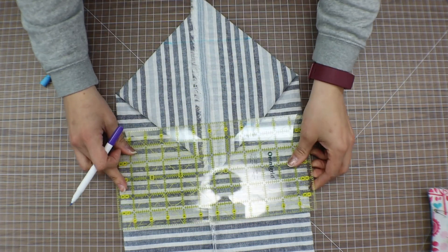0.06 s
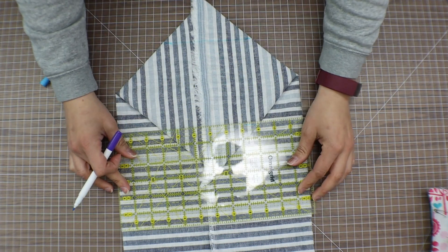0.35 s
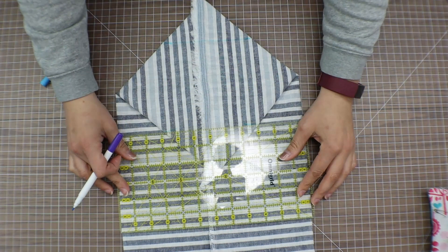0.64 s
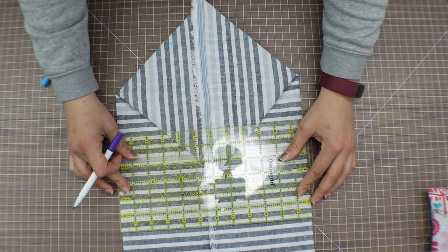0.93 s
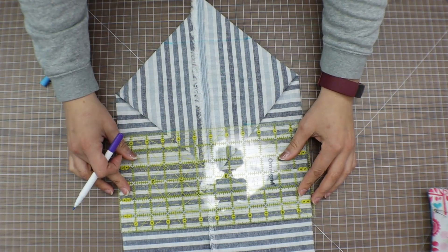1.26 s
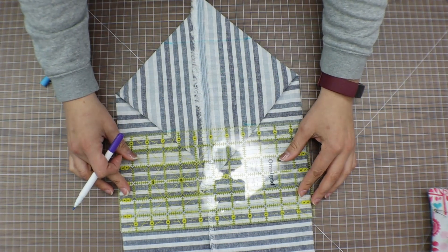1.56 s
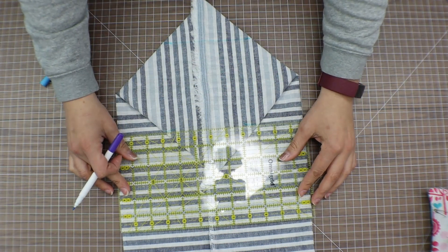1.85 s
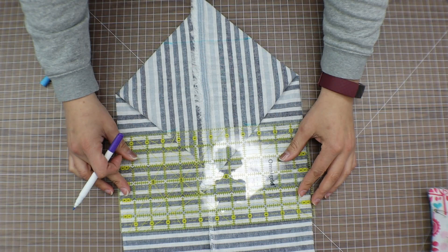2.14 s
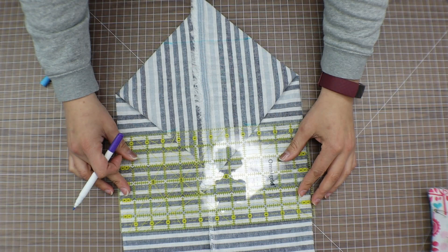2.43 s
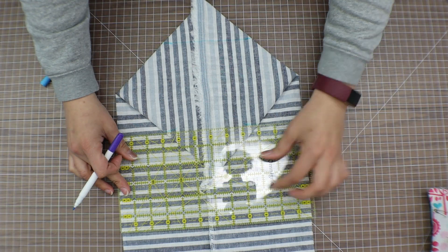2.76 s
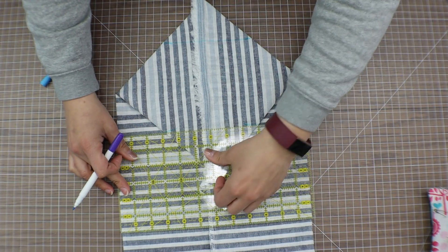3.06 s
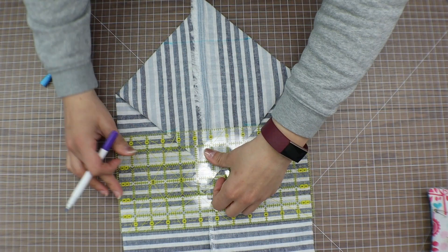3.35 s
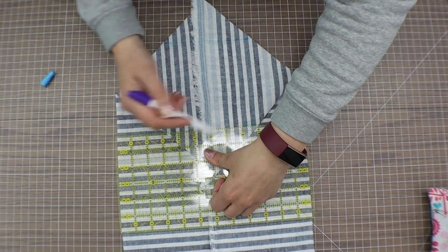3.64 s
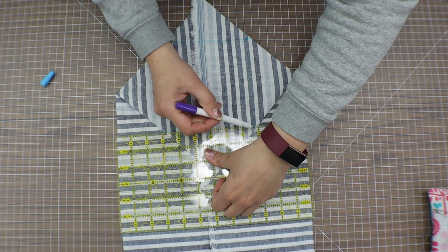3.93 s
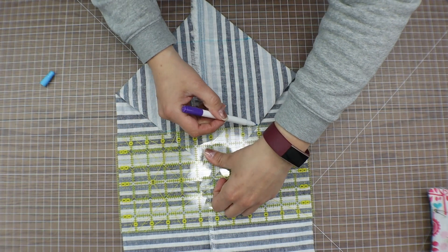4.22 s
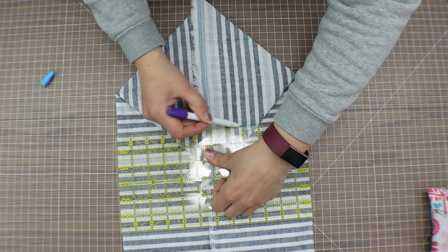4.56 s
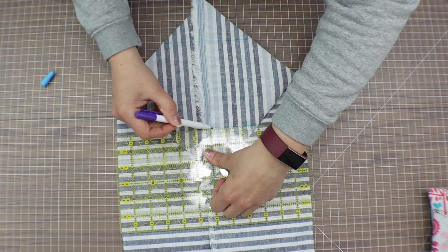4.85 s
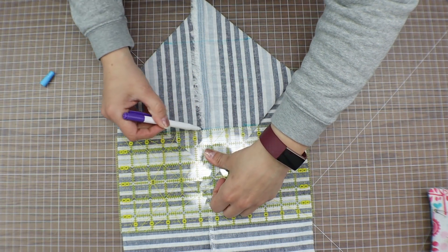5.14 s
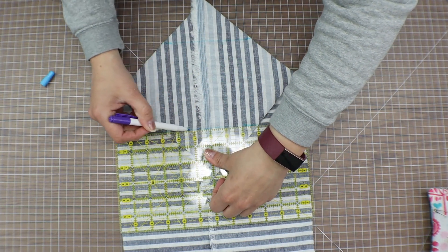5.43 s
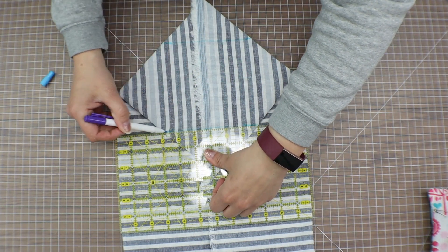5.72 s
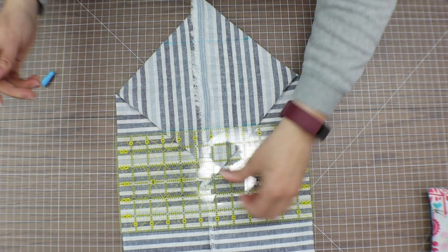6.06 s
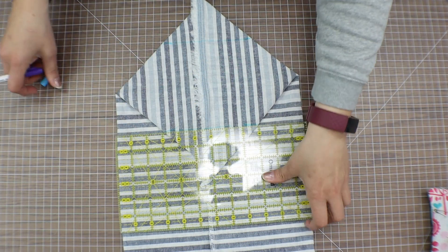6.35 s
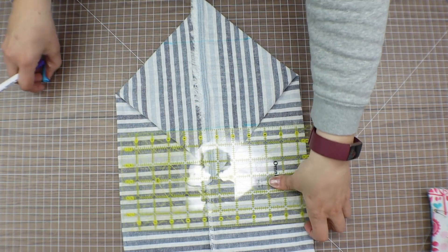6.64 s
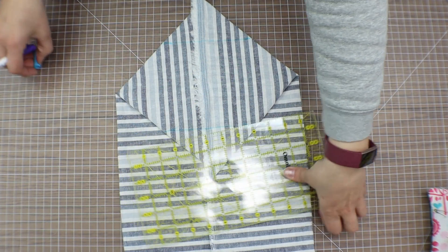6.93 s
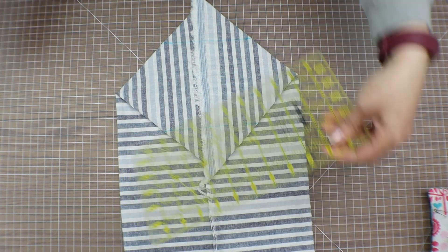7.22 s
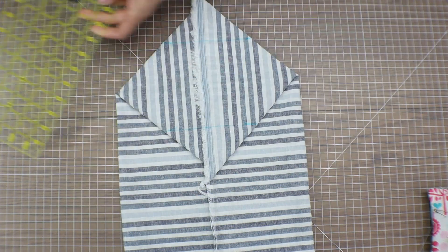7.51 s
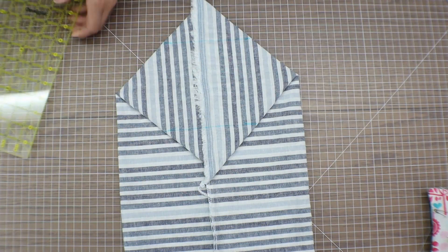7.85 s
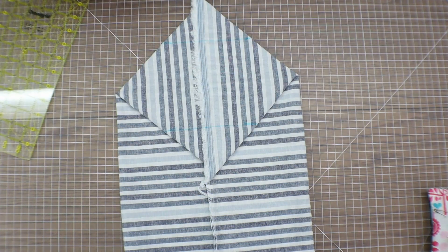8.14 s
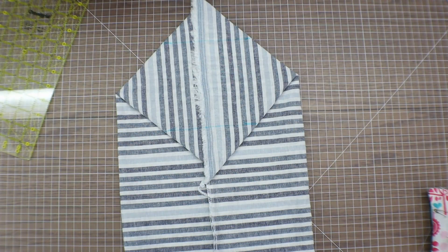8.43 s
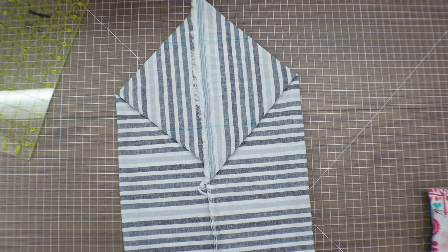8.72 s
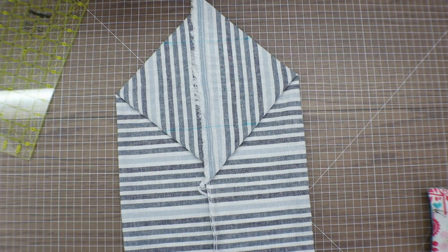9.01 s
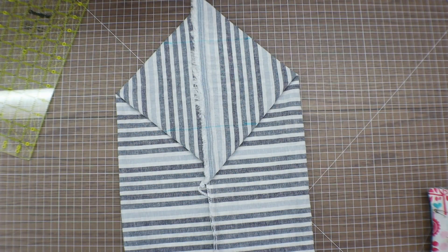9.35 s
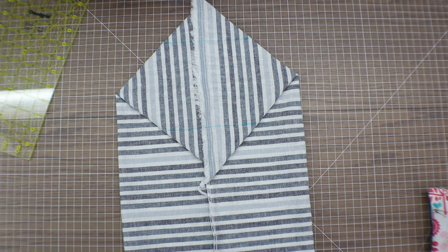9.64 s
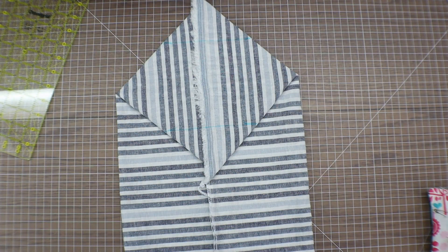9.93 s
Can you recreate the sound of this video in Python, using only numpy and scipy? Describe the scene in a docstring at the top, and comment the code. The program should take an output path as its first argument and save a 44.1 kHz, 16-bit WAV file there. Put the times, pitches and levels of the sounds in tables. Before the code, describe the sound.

A fan hums steadily in a small room, and everything is heard from one close microphone. In the first half second a plastic ruler is nudged over fabric on a cutting mat, with soft clicks, brief scrapes and a sleeve swish. After a lull, a light tap, a click and soft bumps come between 3 and 3.5 seconds. From about 4.5 to 5.8 seconds a felt marker hisses and rasps faintly in short strokes, with small ticks. Two sharper taps follow at 6 seconds. From 6.3 to 7.3 seconds the ruler clicks and slides off the cloth as sleeves rustle. Around 7.8 seconds it drops onto the mat with a sharp double clack, the loudest sound, briefly overloading, then rattles to rest as the table thumps. Faint plastic squeaks follow just after 8 seconds, and a few tiny ticks near 9.4 seconds.

```python
"""An acrylic ruler is nudged over fabric on a cutting mat, and a felt marker hisses along its edge.
The ruler is slid off, lifted and dropped on the mat: waves race through the plastic as a sharp
clack, and the table shakes. Sleeves swish, fingers tap and sliding plastic squeaks faintly.
A fan hums in the small room; one close microphone hears it all and overloads on the clack."""
import sys
import numpy as np
from scipy import signal
from scipy.fft import rfft, irfft, next_fast_len
from scipy.io import wavfile
from scipy.ndimage import map_coordinates

SR = 44100
rng = np.random.default_rng(int(sys.argv[2]) if len(sys.argv) > 2 else 0)


def output_pcm(signal):
    """Save a mono or channel-first signal as 16-bit PCM at the path in sys.argv[1].

    Samples are clipped to [-1, 1] before scaling.
    """
    pcm = np.clip(np.atleast_2d(signal).T, -1, 1) * 32767
    wavfile.write(sys.argv[1], SR, np.round(pcm).astype(np.int16))


N = 440118
TOP_HZ = 15850  # the highest frequency the recorder keeps

# light hits and bounces of the ruler's edge:
# (time [s], level [dB], brightness [dB per octave], knock on the mat [dB])
LIGHT_HITS = [(0.034, -34, -13, -39), (0.147, -31.5, -3, -42), (0.155, -37, 2, -50),
              (3.409, -26, -3.5, -38), (6.3033, -29, 0.5, -43), (6.335, -37, -2, -38),
              (6.433, -32.5, 2, -54), (6.448, -32, -7, -33), (6.494, -28, -2.5, -34),
              (6.502, -27, -4, -29.5), (6.521, -27, -2.5, -42), (6.691, -20.5, -2.5, -43),
              (6.697, -23.5, -1.5, -48), (6.8395, -27, 2.5, -36), (7.8238, -19, 1.5, -32.5),
              (7.917, -21, 1.5, -33), (7.9274, -17, 3.5, -31), (7.94, -20, 1, -30),
              (7.990, -15.5, 1.5, -24)]
# the dropped ruler lands on one end, then on the other: same columns
HARD_HITS = [(7.7893, -6, 2.5, -24), (7.9046, 6, -1, -28)]


def amp(db):
    """Turn decibels into a gain."""
    return 10 ** (np.asarray(db) / 20)


def unit(x):
    """Scale a sound to an average strength (rms) of 1."""
    return x / np.sqrt(np.mean(x ** 2) + 1e-20)


def along(points, hz):
    """Read between (frequency, value) points, with octaves evenly spaced."""
    freqs, values = np.transpose(points)
    return np.interp(np.log(hz + 1), np.log(freqs), values)


def fade(t, t60):
    """Die away by 60 dB every t60 seconds."""
    return np.exp(-np.log(1000) * t / max(t60, 1e-4))


def wobble(rate):
    """A smooth curve through `rate` random values a second."""
    values = rng.standard_normal(int(N * rate / SR) + 4)
    return map_coordinates(values, [np.arange(N) * rate / SR])


def filtered(x, response):
    """Turn each frequency of x up or down by the gain response(hz)."""
    size = next_fast_len(len(x) + 8192)
    return irfft(rfft(x, size) * response(np.fft.rfftfreq(size, 1 / SR)), size)[:len(x)]


def causal(db):
    """A filter with these levels that never sounds before it is struck (minimum phase)."""
    cepstrum = irfft(np.log(amp(db)))
    half = len(cepstrum) // 2
    cepstrum[1:half] *= 2
    cepstrum[half + 1:] = 0
    return np.exp(rfft(cepstrum))


def add(track, start_s, sound):
    """Mix a sound into the track."""
    start = max(round(start_s * SR), 0)
    track[start:start + len(sound)] += sound[:len(track) - start]


def gestures(rows, attack_s, release_t60):
    """One loudness curve per level column: each (start, length, levels) row swells, holds and fades."""
    curves, t = np.zeros((len(rows[0]) - 2, N)), np.arange(2 * SR) / SR
    for start, length, *db in rows:
        shape = np.clip(t / attack_s, 0, 1) * fade(np.maximum(t - length, 0), release_t60)
        span = curves[:, max(round(start * SR), 0):][:, :len(t)]
        span[:] = np.maximum(span, np.outer(amp(db), shape))
    return curves


def friction(colour, catch_rate, catch_db):
    """Rubbing noise: its strength jumps as threads catch and let go, and the rubbed thing colours it."""
    force = rng.standard_normal(N) * amp(catch_db * wobble(catch_rate))
    return unit(filtered(force, lambda hz: amp(along(colour, hz))))


def fan(mains_hz=60, blade_hz=272.35, air_db=-50, waver_db=1.0, drift_radians=0.027):
    """The mains supply hums, the blades add a tone and the air rushes steadily."""
    # hum at 1, 2, 3... times the mains frequency: (level [dB])
    mains_levels = [-61.5, -69, -65, -62.5, -82, -66, -71, -65, -55, -70]
    # the blade tone, then tones above it, each one mains frequency higher: (level [dB])
    blade_levels = [-51.5, -50.5, -64.5, -64.5, -51, -63.5]
    # rushing air and microphone hiss: (frequency [Hz], level [dB])
    air_colour = [(20, 0.5), (45, -5), (90, -1), (140, 3.5), (200, -2), (300, 0.5), (500, -2.5),
                  (700, -6.5), (1100, -8.5), (2000, -14), (3600, -16.5), (6000, -22.5), (11000, -24),
                  (15500, -25.5)]
    tones = [(mains_hz * (k + 1), db) for k, db in enumerate(mains_levels)]
    tones += [(blade_hz + mains_hz * k, db) for k, db in enumerate(blade_levels)]
    hum, t = np.zeros(N), np.arange(N) / SR
    for hz, db in tones:
        gain = amp(db + waver_db * wobble(3.7))
        hum += gain * np.sin(2 * np.pi * (hz * t + rng.random()) + drift_radians * wobble(1.64))
    air = unit(filtered(rng.standard_normal(N), lambda hz: amp(along(air_colour, hz))))
    return np.sqrt(2) * hum + amp(air_db) * air


def arms():
    """Moving arms swish their sleeves, and their weight rocks the table."""
    # arm movements: (start [s], length [s], swish [dB], weight on the table [dB])
    moves = [(0, 0.29, -59.5, -51.5), (2.68, 0.15, -80, -56), (3.1, 0.15, -71, -51), (3.42, 0.26, -66, -54),
             (5.24, 0.14, -70, -51), (6.31, 0.055, -63, -44), (6.47, 0.72, -55.5, -44.5),
             (7.33, 0.11, -58, -68)]
    # rustling cloth: (frequency [Hz], level [dB])
    sleeve_colour = [(300, -40), (1000, -26), (1800, 8.5), (3600, 6.5), (5000, -2.5), (8000, -4),
                     (11000, -11), (15500, -35)]
    # the table's rumble: (frequency [Hz], level [dB])
    table_colour = [(18, -3), (27, 6.5), (40, -7), (60, 5.5), (90, -0.5), (140, -10.5), (300, -27),
                    (1000, -90)]
    swish, _ = gestures(moves, attack_s=0.028, release_t60=1.7)
    _, weight = gestures(moves, attack_s=0.028, release_t60=0.55)
    sleeves = swish * friction(sleeve_colour, catch_rate=100, catch_db=1.0)
    return sleeves + weight * friction(table_colour, catch_rate=17, catch_db=-1)


def thumps(rise_cycles=0.11, ring_cycles=21.7, puff_db=-8, puff_t60=0.69, knock_lag_s=0.0014):
    """Soft blows and the ruler's knocks swing the table top; mat and cloth add a dull puff of noise."""
    # blows of hands and the flat ruler: (time [s], level [dB], pitch [Hz])
    blows = [(0.010, -31, 1000), (3.125, -40, 61.6), (3.429, -30.5, 58.6), (4.708, -33.5, 790),
             (5.246, -42, 148), (5.306, -37, 101), (5.335, -44, 59), (6.644, -31.5, 328), (6.846, -28, 256),
             (6.86, -41, 59.4), (6.994, -31.5, 320), (7.072, -37, 113), (7.115, -36, 122),
             (7.790, -24.5, 109.5), (7.896, -24, 229), (7.929, -27, 350), (8.004, -21.5, 58.3),
             (8.02, -33, 25)]
    # tones of the knocked mat: (pitch [Hz], level added to the knock [dB])
    mat_tones = [(225, -2.5), (430, 0.5), (720, -2)]
    track, t = np.zeros(N), np.arange(SR // 2) / SR
    knocks = [(start + knock_lag_s, knock_db + db, hz)
              for start, _, _, knock_db in HARD_HITS + LIGHT_HITS for hz, db in mat_tones]
    for start, db, hz in blows + knocks:
        shape = fade(t, ring_cycles / hz) * (1 - np.exp(-t * hz / rise_cycles))  # low ones last longest
        noise = rng.standard_normal(len(t))
        near_pitch = unit(filtered(noise, lambda f: 1 / (1 + (1.4 * np.log((f + 1) / hz)) ** 4)))
        puff = amp(puff_db) * near_pitch * fade(t, puff_t60)
        add(track, start, amp(db) * shape / shape.max() * (np.sin(2 * np.pi * hz * t) + puff))
    return track


def ruler_clacks(echo_gain=0.073, ring_db=-37, size=8192):
    """A hit sends a bending wave through the ruler: highs arrive first, edges echo it, tones ring on."""
    # the sound of struck acrylic: (frequency [Hz], level [dB])
    clack_colour = [(150, -9), (400, -10.5), (700, -13), (980, 3), (1080, 1), (1400, 2.5), (1650, -3.5),
                    (1850, -1), (2600, 1), (3500, -3.5), (5200, -12), (9000, -14), (12000, -21.5),
                    (15500, -53)]
    # the ruler's own tones: (pitch [Hz], level [dB], time to fade 60 dB [s])
    ring_tones = [(884, 2, 0.054), (1020, -4, .07), (1100, -13, 0.049), (1250, 17, .05), (1340, 13, .05),
                  (1600, -1, .05), (1798, 8, 0.055), (1914, 14.5, 0.044), (2300, 14, 0.021),
                  (2300, 0, .045), (2870, -17, .04), (3340, -10, .04), (3530, -1, 0.062), (3830, -10, .045)]
    track, t = np.zeros(N), np.arange(size) / SR
    hz = np.fft.rfftfreq(size, 1 / SR)
    octaves = np.log2(np.maximum(hz, 200) / 2500)
    # travel_s: how long a 1 kHz wave takes to cross; buzz: the edge rattling against the mat
    for hits, travel_s, buzz_db, buzz_t60 in [(HARD_HITS, 0.0028, -19, 0.014),
                                              (LIGHT_HITS, 0.001184, -15.5, 0.021)]:
        lag = 4 * np.pi * travel_s * np.sqrt(1000 * hz)  # speed grows with the square root of frequency
        first_arrival = 2 * np.pi * hz * travel_s * np.sqrt(1000 / TOP_HZ)  # time counts from here
        wave = np.exp(1j * (first_arrival - lag)) * (1 + echo_gain * np.exp(-1j * lag))
        for start, db, brightness, _ in hits:
            colour = causal(along(clack_colour, hz) + brightness * octaves)
            buzz = amp(buzz_db) * rng.standard_normal(size) * fade(t, buzz_t60)
            crack = irfft(colour * wave * (1 + rfft(buzz)))
            crack *= 4 / np.linalg.norm(crack)
            ring = np.zeros(size)
            for pitch, level, t60 in ring_tones:
                gain = amp(level + rng.normal(0, 1)) * rng.choice([-1, 1])
                ring += gain * np.sin(2 * np.pi * pitch * t) * fade(t, t60)
            add(track, start, amp(db) * (crack + amp(ring_db) * ring))
    return track


def ruler_drags():
    """The flat ruler moves over the cloth in tiny slips."""
    # pushes of the hand: (start [s], length [s], level [dB])
    pushes = [(0.045, 0.115, -42.5), (0.2, 0.26, -52.5), (3.5, 0.92, -58.5), (6.32, 0.045, -51),
              (6.49, 0.047, -38.5), (6.59, 0.17, -46), (6.96, 0.088, -44.5), (7.1, 0.17, -52.5)]
    # plastic rubbing on cloth: (frequency [Hz], level [dB])
    rub_colour = [(25, -30), (80, -23), (200, -0.5), (400, 4.5), (720, -0.5), (1020, 1.5), (1450, -6.5),
                  (2500, -22), (5000, -40), (12000, -70)]
    loudness, = gestures(pushes, attack_s=0.015, release_t60=0.21)
    return loudness * friction(rub_colour, catch_rate=160, catch_db=3.5)


def ruler_scrapes():
    """The ruler's edge scrapes briefly, which stirs its high resonances."""
    # scrapes of the edge: (start [s], length [s], level [dB])
    scrapes = [(0.166, 0.028, -45.5), (0.286, 0.012, -43), (4.908, 0.013, -55), (5.291, 0.011, -45),
               (6.34, 0.035, -51), (6.685, 0.017, -39), (7.165, 0.018, -54)]
    # the edge's resonances: (frequency [Hz], level [dB])
    edge_colour = [(700, -30), (1300, -7), (1730, 6.5), (2150, -19), (2750, 8), (3250, -12), (3700, -1),
                   (4400, -16), (5200, -2), (6200, -19), (7500, -7.5), (10000, -16), (15000, -35)]
    loudness, = gestures(scrapes, attack_s=0.0084, release_t60=0.054)
    return loudness * friction(edge_colour, catch_rate=300, catch_db=3.0)


def taps(rise_s=0.00048, swing_t60=0.0074, snap_t60=0.025, size=4096):
    """Tapped plastic gives a snap and swings a few times before the hand stills it."""
    # taps of marker, fingertips and small things: (time [s], level [dB], pitch [Hz], relative snap [dB])
    touches = [(3.0948, -31, 1130, -4), (4.708, -25, 1350, 5), (5.236, -33.5, 1380, 2),
               (5.2420, -22, 1320, -9), (5.2416, -30.5, 2570, -7), (5.299, -33.5, 1300, 0),
               (5.528, -23, 258, -26), (5.8495, -31, 2320, 8.5), (6.0434, -18, 1170, -8.5),
               (6.0773, -16.5, 1160, -8.5), (6.690, -24.5, 1054, -22), (6.801, -32, 900, -7),
               (8.145, -36.5, 3260, 4), (9.416, -37, 2760, 3), (9.422, -33, 2470, 0), (9.426, -39, 2560, 4),
               (9.434, -32.5, 2320, 7.5), (9.449, -34, 5300, 10.5)]
    # the snap of a hard contact: (frequency [Hz], level [dB])
    snap_colour = [(500, 4), (1500, 7.5), (3000, 6), (6000, -5.5), (10000, -10), (15000, -27)]
    track, t = np.zeros(N), np.arange(size) / SR
    colour = causal(along(snap_colour, np.fft.rfftfreq(size, 1 / SR)))
    for start, db, hz, snap_db in touches:
        swing = np.sin(2 * np.pi * hz * t) * fade(t, swing_t60) * (1 - np.exp(-(t / rise_s) ** 2))
        snap = irfft(colour * rfft(rng.standard_normal(size) * fade(t, snap_t60)))
        snap *= 3.05 / np.linalg.norm(snap)
        add(track, start, amp(db) * (swing / swing.max() + amp(snap_db) * snap))
    return track


def marker():
    """The felt tip hisses across the weave and makes the marker's barrel rasp."""
    # marker strokes: (start [s], length [s], hiss [dB], rasp [dB])
    strokes = [(4.48, 0.25, -58.5, -52), (4.69, 0.14, -55, -55), (4.87, 0.13, -58, -51.5),
               (5.15, 0.16, -67, -56), (5.44, 0.4, -61, -57.5)]
    # the tip's hiss: (frequency [Hz], level [dB])
    felt_colour = [(800, -60), (3000, -22), (5200, -9), (6800, -11), (8500, 0), (10000, -6), (12000, -13),
                   (15500, -24)]
    # the barrel's resonances: (frequency [Hz], level [dB])
    barrel_colour = [(150, -50), (600, -14), (900, 0.5), (1350, 5), (1950, -7), (2400, -0.5), (2900, -5),
                     (3500, -3.5), (4400, -17), (5300, -5.5), (7000, -36), (14000, -50)]
    hiss, rasp = gestures(strokes, attack_s=0.033, release_t60=0.47)
    tip = hiss * friction(felt_colour, catch_rate=130, catch_db=2.0)
    return tip + rasp * friction(barrel_colour, catch_rate=280, catch_db=3.0)


def squeaks(width_hz=220):
    """Sliding plastic sticks and slips, which makes it sing around one pitch."""
    # faint squeaks: (time [s], level [dB], pitch [Hz], length [s])
    chirps = [(8.126, -52, 3200, 0.045), (8.217, -55.5, 3150, 0.075), (9.386, -47, 3060, 0.011)]
    track = np.zeros(N)
    for start, db, hz, length in chirps:
        slips = rng.standard_normal(SR // 4)[:round(length * SR)]
        tone = unit(filtered(slips, lambda f: 1 / (1 + ((f - hz) / width_hz) ** 2)))
        add(track, start, amp(db) * tone * np.hanning(len(tone)))
    return track


def room(x, delay_s=0.004):
    """The close walls return a wash of echoes in which each frequency dies at its own speed."""
    # how long the room rings: (frequency [Hz], time to fade 60 dB [s])
    fade_times = [(100, 1), (1000, 0.24), (4000, 0.25), (9000, 0.26), (15000, 0.14)]
    # what the walls send back: (frequency [Hz], level [dB])
    wall_colour = [(100, 0.5), (500, 3.5), (1000, -2.5), (2000, -4), (4000, -0.5), (6000, 1), (10000, 1.5),
                   (12500, 0), (15000, -9)]
    hz, t, noise = signal.stft(rng.standard_normal(SR // 2), SR, nperseg=256)
    decay = amp(-60 * t / along(fade_times, hz)[:, None])
    _, tail = signal.istft(noise * decay, SR, nperseg=256)
    tail = filtered(tail / np.linalg.norm(tail), lambda f: amp(along(wall_colour, f)))
    return signal.fftconvolve(x, np.pad(tail, (round(delay_s * SR), 0)))[:N]


def scene():
    """Everything reaches one microphone, so both channels are alike."""
    clacks, tapping = ruler_clacks(), taps()
    rubbing = marker() + ruler_drags() + ruler_scrapes() + arms() + squeaks()
    echoes = room(amp(-9.5) * clacks + amp(-12) * (tapping + rubbing))
    mono = clacks + tapping + thumps() + rubbing + echoes + fan()
    return np.array([mono, mono])


def record(dry):
    """The recorder flattens peaks that are too loud and keeps nothing above TOP_HZ."""
    clipped = np.clip(dry, -1, 1)
    return np.array([filtered(channel, lambda hz: hz < TOP_HZ) for channel in clipped])


dry = scene()
out = record(dry)
output_pcm(out)
```